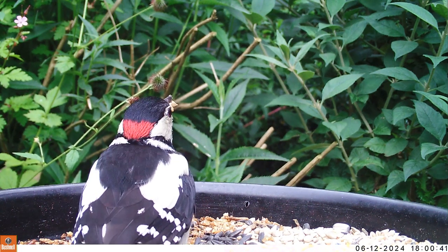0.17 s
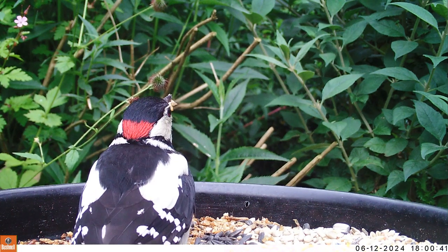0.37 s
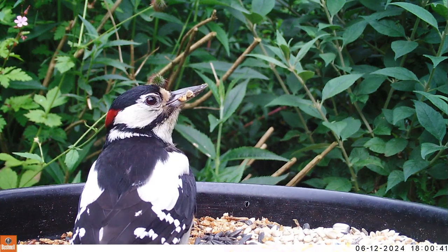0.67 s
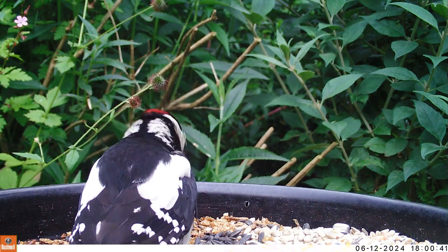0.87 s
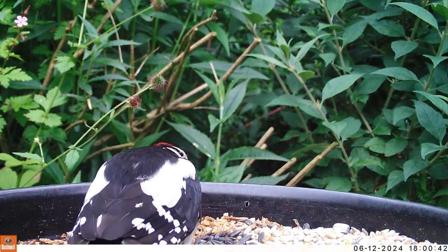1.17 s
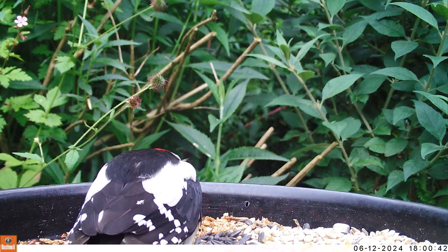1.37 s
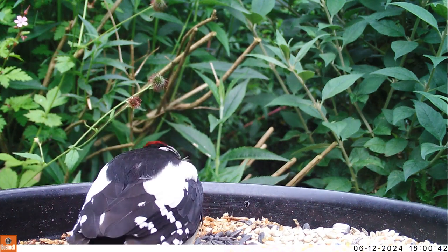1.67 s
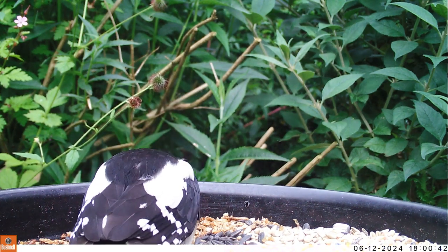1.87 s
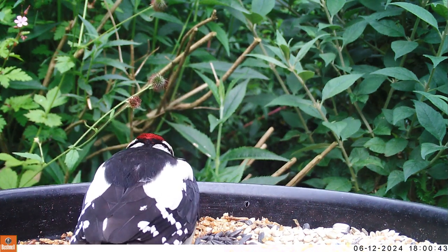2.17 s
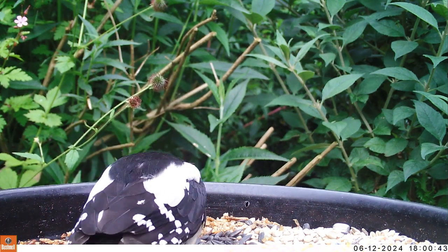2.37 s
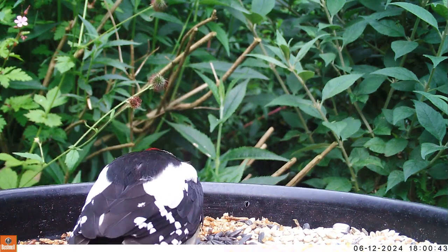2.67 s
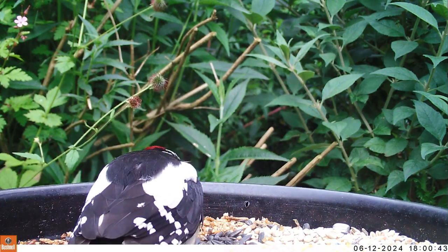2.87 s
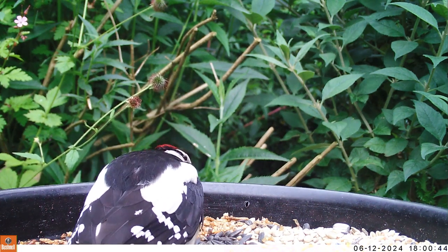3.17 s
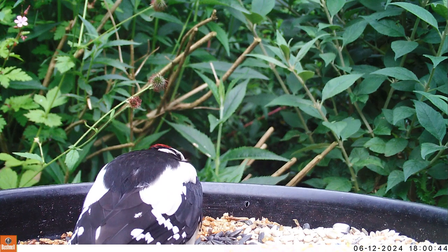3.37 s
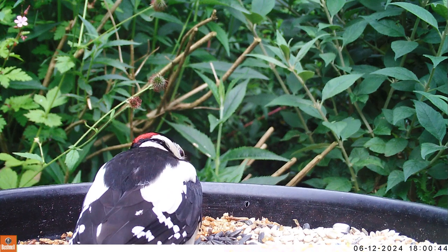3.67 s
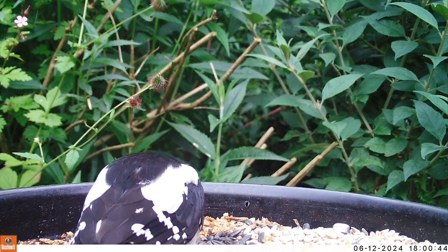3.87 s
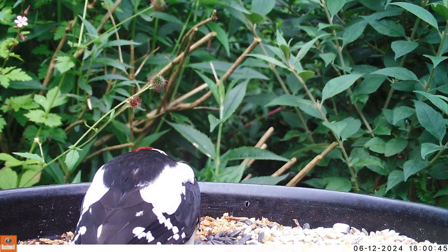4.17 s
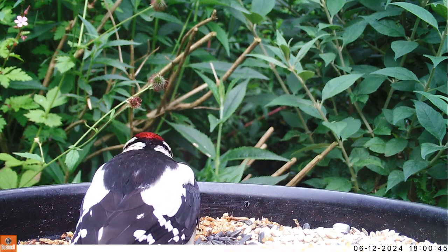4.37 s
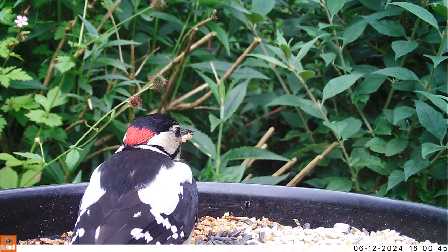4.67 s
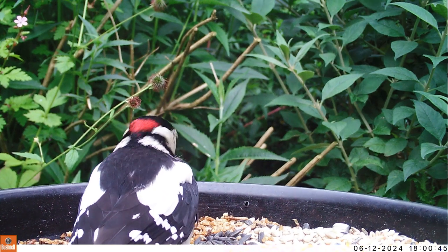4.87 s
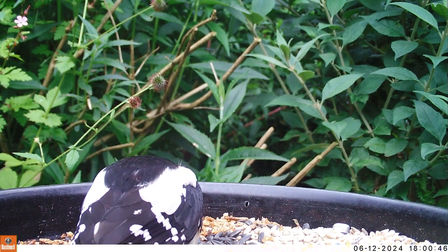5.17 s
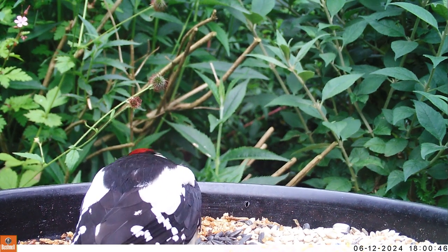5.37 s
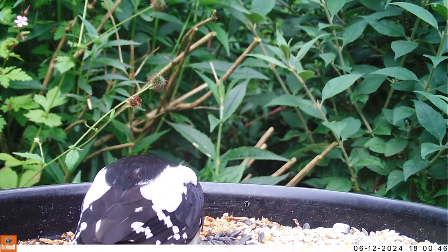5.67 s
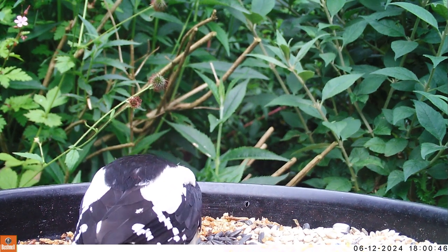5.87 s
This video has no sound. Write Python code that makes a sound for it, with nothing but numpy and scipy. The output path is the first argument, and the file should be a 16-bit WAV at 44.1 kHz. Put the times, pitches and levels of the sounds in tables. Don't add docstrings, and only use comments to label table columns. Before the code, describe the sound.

Close dry pecks, small plastic knocks and one crunchy seed crack, with thin whistles, blurred distant birdsong, light wind and faint far traffic.

```python
import sys
import numpy as np
from scipy import signal
from scipy.fft import rfft, irfft, next_fast_len
from scipy.io import wavfile
from scipy.ndimage import map_coordinates

SR = 44100
rng = np.random.default_rng(int(sys.argv[2]) if len(sys.argv) > 2 else 0)


def decibels_to_gain(level_db):
    exponent = np.asarray(level_db, float) / 20
    return 10 ** exponent


def unload_audio(sound):
    columns = np.transpose(np.atleast_2d(sound))
    steps = np.round(np.clip(columns, -1, 1) * 32767)
    wavfile.write(sys.argv[1], SR, steps.astype(np.int16))


N = 264996

# pitch_hz, width_hz, level_db
PORT_RING = [(3825, 673, 11), (4234, 690, 9.5)]
# pitch_hz, width_hz, level_db
SHELL_SNAP = [(6400, 2800, -2), (10060, 720, 2), (11800, 1340, 4)]
# pitch_hz, width_hz, level_db
TRAY_RING = [(1820, 160, -0.5), (2430, 350, 3.5)]
# pitch_hz, width_hz, level_db
BASE_THUD = [(553, 130, -2), (987, 165, 5.5)]


def pecks():
    near = hard_blows() + scuffs() + splinters() + squeaks()
    near = rim(near) + knocks()
    near = filtered(near, lambda f: 1 / (1 + (f / 13200) ** 16))
    return garden(near, wet_db=-24)


def hard_blows():
    # start_s, snap_db, husk_db, ring_db
    ticks = [(0.0144, -50.5, 2.5, 5), (0.147, -55, -9, -6), (0.184, -59, -10, 2), (0.1878, -57, -9, 12),
             (0.1947, -47, -8, -1.5), (0.2857, -57.5, 4.5, 9), (0.4414, -51, -20, -10),
             (0.9487, -54, -10, -7), (2.2945, -32, -6.5, -3), (2.4637, -51.5, 2, 14),
             (3.6265, -41.5, -2.5, -11), (4.155, -64, 2, 15.5), (4.3957, -50.5, -6, -2.5),
             (4.4588, -54, -6, 0.5), (4.8243, -62, 14, 25), (5.1478, -60, 3.5, 8), (5.1425, -64, 4, 6),
             (5.154, -58, -2, 0), (5.9415, -58, -2, 5.5), (5.95, -64, 0, 6), (3.052, -69, -2, 10),
             (5.1674, -58, -15, -5), (5.219, -52, -9, -13), (5.2384, -52, -10, -5), (5.3916, -53, -10, -9),
             (5.417, -70, 6, 20), (5.4493, -52, -3, -14), (5.4517, -34, -14, -11.5), (5.6925, -62.5, 2, 14),
             (5.9396, -63, 5, 5), (5.9917, -57, 0, -9)]
    crack_blows = [(4.7209, -52, 7, 6), (4.7233, -44, 8, 10), (4.7436, -50, -3, -1), (4.7617, -59, 8, 7)]
    taps = [(0.1301, -46.5, -6.5, -8), (0.3854, -56, -10, 5), (0.4923, -68, -5, 2), (1.1223, -66, 5, 12),
            (1.1418, -62, -3, 3), (1.7794, -65, 0, 4), (1.9994, -67.5, 2, 13), (2.4073, -66, 8, 8),
            (2.9445, -63, -5, 10), (3.172, -70.5, 8, 13), (3.8995, -60, 7, 10), (5.3547, -63.5, 5, 19),
            (5.8964, -69, -3, 7)]
    # pitch_hz, width_hz, level_db
    snap = [(11900, 1700, -0.5)]
    # pitch_hz, width_hz, level_db
    husk = [(5050, 770, 5), (7100, 2900, -1), (9750, 920, 2.5)]
    rows = []
    for table, knock_db, t60 in [(ticks + crack_blows, -14, 0.0042), (taps, -4, 0.0073)]:
        for s, db, husk_db, ring_db in table:
            rows.append((s, db, husk_db, ring_db, ring_db + knock_db, t60))
    return contacts(rows, [(snap, 0), (husk, -1), (PORT_RING, -1), (TRAY_RING, 6)], blow=8.1)


def scuffs():
    # start_s, snap_db, ring_db, thud_db
    scuff_rows = [(0.0774, -66.5, -2, 6), (0.1193, -58, -2, -18), (0.135, -57, -3, -2),
                  (0.2496, -70, 10, 7), (0.3712, -57.5, -16, -10), (0.3955, -61, -2, -14),
                  (0.5423, -62.5, 1, 1), (0.618, -67, 3, 6), (0.7302, -72, -6, 11), (0.843, -68, 2, -2),
                  (0.9108, -64, 1, 2), (0.987, -65, 4, -1), (1.0272, -67, 6.5, 1), (2.404, -62, 5, -6),
                  (3.4418, -76, 14, 7), (3.8993, -62.5, 15.5, 6.5), (4.154, -64, 14.5, 0),
                  (4.3, -66, 3, -7), (4.5945, -58.5, 4, -14), (4.633, -57.5, 6, -9), (4.853, -65, 3, -9),
                  (5.1417, -66, 11, 5), (5.1499, -63, 9, 3), (5.2944, -73.5, 19, -3),
                  (5.3567, -64.5, 11, 5), (5.892, -65.5, 13, 0), (5.982, -69, 9, -2.5),
                  (5.9894, -57.5, 8.5, -10)]
    knock_db, t60 = -7, 0.054
    rows = [(s, db, ring_db, ring_db + knock_db, thud_db, t60) for s, db, ring_db, thud_db in scuff_rows]
    return contacts(rows, [(SHELL_SNAP, 0), (PORT_RING, 1), (TRAY_RING, 8), (BASE_THUD, 13)], blow=0)


def splinters():
    # start_s, level_db
    crumble = [(4.7188, -55), (4.7236, -48), (4.7295, -53), (4.735, -53), (4.7436, -52), (4.751, -56),
               (4.7617, -53)]
    ring_db, knock_db, thud_db, t60 = 1, 5, -9, 0.039
    rows = [(s, db, ring_db, knock_db, thud_db, t60) for s, db in crumble]
    shell = SHELL_SNAP[1:] + [(5600, 1200, 7.3)]
    return contacts(rows, [(shell, 0), (PORT_RING, 1), (TRAY_RING, 8), (BASE_THUD, 13)], blow=0)


def squeaks():
    # start_s, end_s, first_hz, last_hz, level_db
    squeak_rows = [(4.7254, 4.7302, 4000, 3950, -35), (4.731, 4.7338, 4200, 4200, -46),
                   (4.734, 4.741, 3900, 3750, -41), (4.7465, 4.754, 3850, 3850, -46),
                   (4.7625, 4.773, 4100, 3800, -48), (4.8248, 4.831, 4050, 3900, -48),
                   (5.1475, 5.1515, 4050, 4000, -47)]
    out = np.zeros(N)
    for s, end, hz, last_hz, db in squeak_rows:
        rows = [(s, hz, db), (.7 * s + .3 * end, hz, db), (end, last_hz, db - 5)]
        add(out, s, note(rows, overtone_db=-40))
    return out


def knocks():
    # start_s, pitch_hz, peak_db
    knock_rows = [(3.9005, 1000, -50), (3.9013, 2200, -58), (4.726, 2500, -49), (4.735, 2400, -50),
                  (4.750, 2300, -50), (5.149, 1000, -46), (5.1505, 1050, -44.5), (5.150, 2300, -48),
                  (5.356, 1000, -55), (5.4517, 900, -57), (5.983, 2250, -48)]
    cycles = 12
    out, t = np.zeros(N), np.arange(SR // 30) / SR
    for s, hz, db in knock_rows:
        add(out, s, decibels_to_gain(db - 60 * t * hz / cycles) * np.sin(2 * np.pi * hz * t))
    return out


def contacts(table, bodies, blow):
    drive, t = np.zeros((4, N)), np.arange(SR // 12) / SR
    chance = rng.standard_normal((len(table), len(t)))
    for (s, db, *rest_db, t60), grit in zip(table, chance):
        burst = grit * decibels_to_gain(-60 * t / max(t60, .001))
        burst[8] += blow
        for part, rel_db in zip(drive, [0] + rest_db):
            add(part, s, decibels_to_gain(db + rel_db) * burst)
    return sum(decibels_to_gain(db) * filtered(part, modes(body)) for part, (body, db) in zip(drive, bodies))


def rim(x):
    t60, answer_db = .05, -9
    t = np.arange(SR // 15) / SR
    tail = rng.standard_normal(len(t)) * decibels_to_gain(-60 * t / t60) * (t > .001)
    answer = signal.fftconvolve(x, tail / np.linalg.norm(tail))[:N]
    return x + decibels_to_gain(answer_db) * filtered(answer, lambda f: f ** 2 / (f ** 2 + 6000 ** 2))


def rustle():
    # start_s, level_db
    stir_curve = [(0.0, -68.5), (0.06, -68.5), (0.18, -73), (0.6, -80), (0.78, -77.5), (0.9, -75.5),
                  (1.35, -89.5), (4.08, -86), (4.31, -80), (4.63, -79.5), (4.78, -86), (5.05, -92),
                  (5.26, -87), (5.71, -91), (6.0, -84)]
    grains = rng.standard_normal(N) * decibels_to_gain(3.2 * wobble(70) + 2.2 * wobble(700))
    stir = decibels_to_gain(curves(stir_curve)[0] - 1.0)
    shells = unit(filtered(grains, modes(SHELL_SNAP)))
    ring = unit(filtered(grains, modes(PORT_RING)))
    return stir * (shells + decibels_to_gain(7.0) * ring)


def chirps():
    # start_s, pitch_hz, level_db
    chirp_notes = [
        [(0, 6440, -64), (.008, 7200, -52), (.018, 7620, -46), (.028, 7400, -50), (.04, 6700, -71)],
        [(.762, 6000, -71), (.774, 6600, -79), (.781, 7100, -58.5), (.792, 6900, -70)],
    ]
    close = np.zeros(N)
    for rows in chirp_notes:
        add(close, rows[0][0], note(rows, overtone_db=-40))
    return garden(close, wet_db=-28)


def whistles():
    # (start_s, pitch_hz)
    whistle_rows = [
        (-64, 18, [(2.26, 1635), (2.3, 1700), (2.34, 1750), (2.385, 1720), (2.42, 1815), (2.46, 1930), (2.51, 1800)]),
        (-63, -12, [(2.57, 2760), (2.591, 2030), (2.602, 1830), (2.615, 1730), (2.632, 1760), (2.647, 2060), (2.655, 2050), (2.667, 1860)]),
        (-58.5, 34, [(2.918, 2000), (2.935, 2700), (2.955, 2860), (2.99, 2790), (3.025, 2735), (3.06, 2765), (3.12, 2715), (3.18, 2720), (3.23, 2790)]),
        (-65.5, 50, [(3.09, 2720), (3.117, 2700), (3.122, 2450), (3.136, 1900)]),
        (-62.5, 32, [(1.285, 3715), (1.4, 3700), (1.44, 3670), (1.57, 3700)]),
    ]
    overtone_levels = [-9, -20, -15, -25, -20]
    # start_s, length_s, pitch_hz, level_db
    pip_s, length, pip_hz, pip_db = (3.203, .032, 2955, -61)
    # start_s, level_db
    chuck_rows = [(3.228, -61), (3.247, -62), (3.272, -64)]
    near = np.zeros(N)
    for whistle, overtone_db in zip(whistle_rows, overtone_levels):
        add(near, whistle[2][0][0], note(sung(*whistle), overtone_db))
    short = [[(pip_s, pip_hz, pip_db - 13), (pip_s + length / 2, pip_hz, pip_db),
              (pip_s + length, pip_hz, pip_db - 7.5)]]
    short += [[(s, 2370, db - 5), (s + .018, 1910, db)] for s, db in chuck_rows]
    for rows in short:
        add(near, rows[0][0], note(rows, overtone_db=-22))
    return garden(near * decibels_to_gain(2.4 * wobble(170) + 2.4 * wobble(330)), wet_db=-15)


def far_birds():
    # (start_s, pitch_hz)
    arch = (-73, 8, [(4.94, 3600), (5.01, 3620), (5.03, 3850), (5.07, 3950)])
    # start_s, level_db
    phrase_starts = [(5.165, -75), (5.332, -68.5), (5.49, -68), (5.652, -66.5), (5.814, -67)]
    # start_s, pitch_hz, level_db
    syllables = [
        [(0, 3780, -9), (.008, 3960, 5), (.014, 4000, -2)],
        [(.014, 4660, -18), (.022, 3824, 6.5), (.036, 3350, -10), (.044, 3240, -18)],
        [(.043, 3130, -9), (.052, 3340, -3), (.064, 2920, -4)],
    ]
    # start_s, end_s, first_hz, last_hz, level_db
    thin = [(1.35, 1.5, 4420, 4400, -78.5), (1.58, 1.72, 4550, 4550, -85), (1.6, 1.72, 3760, 3820, -72.5),
            (2.52, 2.7, 3820, 3790, -78), (3.235, 3.29, 2950, 2970, -72), (3.33, 3.4, 2700, 2600, -77),
            (3.4, 3.5, 2590, 2590, -75), (1.22, 1.42, 5600, 5600, -85)]
    blurred = [(3.745, 3.82, 5400, 5300, -83), (.72, 1.0, 4195, 4160, -70), (1.1, 1.14, 3900, 3750, -68),
               (3.22, 3.36, 3330, 2800, -76), (5.04, 5.23, 4220, 4180, -72),
               (3.77, 4.04, 3920, 3880, -66.5), (3.8, 3.96, 3590, 3600, -65),
               (2.99, 3.12, 3650, 3720, -68.5), (3.1, 3.25, 3720, 3900, -72),
               (4.18, 4.42, 3950, 4070, -70.5), (4.675, 4.72, 3800, 4000, -71)]
    harsh = [(1.42, 1.62, 3520, 3420, -69.5), (3.64, 3.68, 3000, 3000, -72), (.5, .68, 8000, 7700, -84),
             (3.66, 3.84, 4450, 4500, -73), (3.765, 4.09, 3710, 3680, -66.5),
             (3.745, 3.79, 2300, 3400, -69.5), (3.97, 4.03, 2600, 2800, -77)]
    rasp = [(3.635, 3.77, 2600, 2660, -72), (3.76, 4.06, 3050, 2936, -69.5), (5.16, 5.27, 3750, 3700, -74)]
    far = np.zeros(N)
    call = note(sung(*arch), overtone_db=-40)
    add(far, arch[2][0][0], call * unit(0.43 + wobble(2 * 180, size=len(call))))
    for s, db in phrase_starts:
        for rows in syllables:
            add(far, s + rows[0][0], decibels_to_gain(db) * note(rows, overtone_db=-40))
    for table, width_hz in [(thin, 55), (blurred, 180), (harsh, 340), (rasp, 600)]:
        for s, end, hz, last_hz, db in table:
            middle = (s + .3 * (end - s), .7 * hz + .3 * last_hz, db)
            tone = note([(s, hz, db - 5), middle, (end, last_hz, db - 6)], overtone_db=-40)
            add(far, s, tone * unit(wobble(2 * width_hz, size=len(tone))))
    return garden(far, wet_db=-4.5)


def sung(peak_db, fade, line):
    swell_s, swell_db, release_s, release_db = .035, 11, .008, 6
    s, hz = np.transpose(line)
    t = np.arange(s[0], s[-1], .004)
    swell = swell_db * np.clip(1 - (t - s[0]) / swell_s, 0, 1)
    release = release_db * np.clip(1 - (s[-1] - t) / release_s, 0, 1)
    return np.transpose([t, np.interp(t, s, hz), peak_db - swell - release - fade * (t - s[0])])


def note(rows, overtone_db):
    s, hz, db = np.transpose(rows)
    t = np.arange(s[0], s[-1], 1 / SR)
    pitch = np.interp(t, s, hz)
    phase = 2 * np.pi * np.cumsum(pitch) / SR
    edge = np.clip(np.minimum(t - s[0], s[-1] - t) / 0.0022, 0, 1)
    second = decibels_to_gain(overtone_db) / (1 + ((2 * pitch - 3700) / 900) ** 4)
    wave = np.sin(phase) + second * np.sin(2 * phase)
    return np.sqrt(2) * decibels_to_gain(np.interp(t, s, db)) * edge * wave


def garden(x, wet_db):
    # pitch_hz, decay_s
    decay = [(1500, 0.86), (4000, 0.44), (9000, 0.091)]
    hz, t, z = signal.stft(rng.standard_normal(SR // 2), SR, nperseg=256)
    z = z * decibels_to_gain(-60 * t / along(decay, hz)[:, None])
    tail = signal.istft(z, SR, nperseg=256)[1]
    late = np.pad(x, (90, 0))
    return x + decibels_to_gain(wet_db) * signal.fftconvolve(late, tail / np.linalg.norm(tail))[:N]


def wind():
    # start_s, strength_db
    wind_curve = [(0, -52.5), (1.0, -54.5), (1.6, -50.5), (2.1, -54), (3.1, -55), (3.6, -48.5), (4.2, -52),
                  (4.65, -47.5), (5.0, -46), (5.3, -53), (6, -52)]
    # start_s, level_db, width_s (its sign is the direction)
    gusts = [(4.599, -53, 0.015), (4.619, -31.5, -0.007), (4.641, -32, 0.0063), (4.663, -36, -0.0088),
             (4.954, -31, 0.0059), (4.975, -38.5, 0.021)]
    t = np.arange(N) / SR
    rumble = unit(filtered(rng.standard_normal(N), lambda f: f / (6 + f) / (1 + (f / 29) ** 3)))
    pushes = sum(np.sign(w) * decibels_to_gain(db) * np.exp(-((t - s) / w) ** 2) for s, db, w in gusts)
    return decibels_to_gain(curves(wind_curve)[0] - 1.0) * rumble + pushes


def engine():
    # start_s, level_db
    load_curve = [(0.0, -51.5), (0.32, -61.5), (0.33, -67), (0.65, -60.5), (2.24, -71), (4.06, -64),
                  (4.18, -72.5), (5.58, -62.5), (5.76, -83), (6.0, -75)]
    drone_db = curves(load_curve)[0] + 0.61 * wobble(3.2)
    return decibels_to_gain(drone_db - 2.5) * unit(filtered(rng.standard_normal(N), modes([(221.4, 15.3, 0)])))


def far_chorus():
    # start_s, level_db
    chorus_curve = [(0, -75), (.33, -73.5), (.9, -71.5), (1.6, -71.5), (2.2, -76.5), (2.8, -76),
                    (3.12, -73.5), (3.5, -76.5), (4.0, -80), (4.2, -67), (4.45, -78), (4.76, -74.5),
                    (5.3, -81), (6, -80)]
    voices = modes([(3900, 800, 0), (3100, 900, -7)])
    song = unit(filtered(rng.standard_normal(N), lambda f: voices(f) ** 2))
    return decibels_to_gain(curves(chorus_curve)[0] + 1.5 * wobble(8.7)) * song


def steady_floor():
    # pitch_hz, level_db per Hz
    floor_curve = [(31, -3), (42, -6.5), (62, -3), (80, -6), (130, -13.5), (200, -14), (310, -23),
                   (650, -29.5), (950, -26.5), (1500, -32), (2700, -39.5), (4800, -46.5), (5500, -49),
                   (8000, -51.7), (12000, -53.7), (14000, -53.7)]
    hiss = filtered(rng.standard_normal(N), lambda f: decibels_to_gain(along([(25, -5.5)] + floor_curve, f)))
    return decibels_to_gain(-53.3 + 0.031 * wobble(1.2)) * unit(hiss)


def unit(x):
    return x / np.sqrt(np.mean(x ** 2) + 1e-20)


def along(points, hz):
    f, v = np.transpose(points)
    return np.interp(np.log(hz + 1), np.log(f + 1), v)


def curves(rows):
    s, *cols = np.transpose(rows)
    return [np.interp(np.arange(N) / SR, s, c) for c in cols]


def wobble(rate, size=N):
    knots = rng.standard_normal(int(size * rate / SR) + 4)
    return map_coordinates(knots, [np.arange(size) * rate / SR])


def filtered(x, response):
    m = next_fast_len(N + SR // 2)
    return irfft(rfft(x, m) * response(np.fft.rfftfreq(m, 1 / SR)), m)[..., :N]


def modes(table):
    def response(f):
        total = 0
        for k, (centre, width, db) in enumerate(table):
            damping = 1j * f * width
            total = total + (-1) ** k * decibels_to_gain(db) * damping / (centre * centre - f * f + damping)
        return total
    return response


def add(out, s, x):
    place = out[max(round(s * SR), 0):][:len(x)]
    place += x[:len(place)]


def scene():
    feeding = pecks() + rustle()
    birds = chirps() + whistles() + far_birds()
    air = wind() + engine() + far_chorus() + steady_floor()
    return (feeding + birds + air)[None]


def roll_off(x):
    return signal.sosfilt(signal.butter(12, 13980, fs=SR, output="sos"), x)


def record(dry):
    dull = filtered(dry, lambda f: 1 / np.sqrt(1 + (f / 13850) ** 70))
    return roll_off(dull)


dry = scene()
out = record(dry)
unload_audio(out)
```